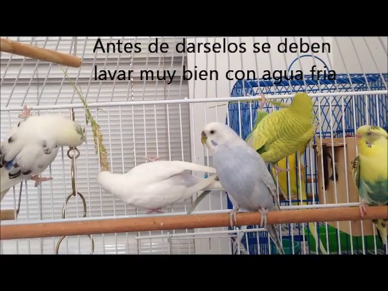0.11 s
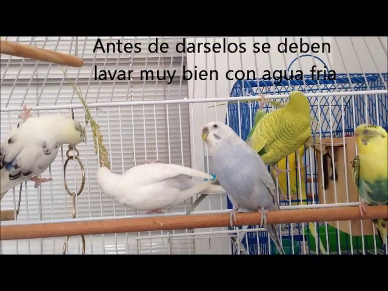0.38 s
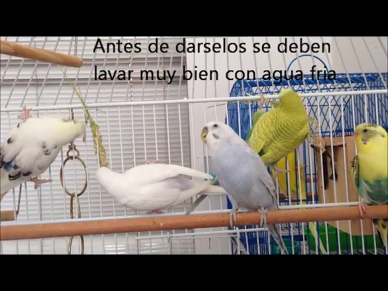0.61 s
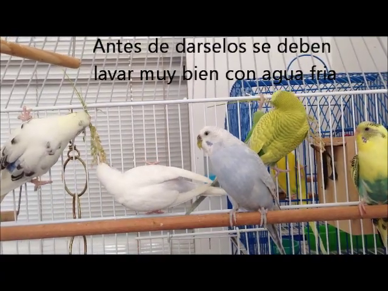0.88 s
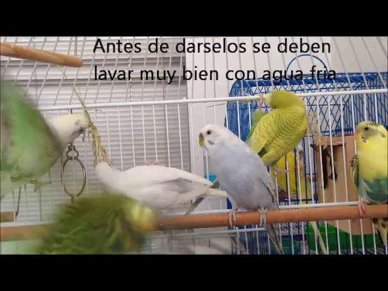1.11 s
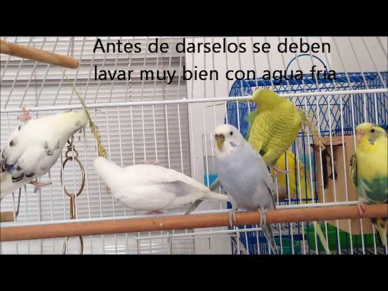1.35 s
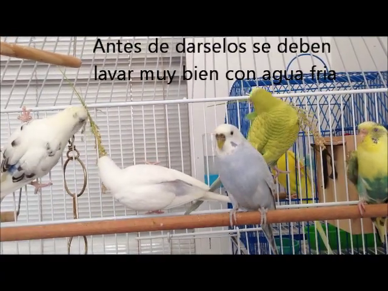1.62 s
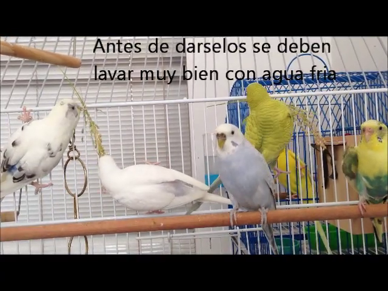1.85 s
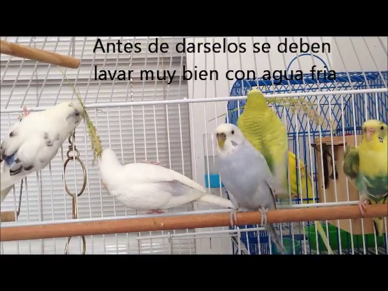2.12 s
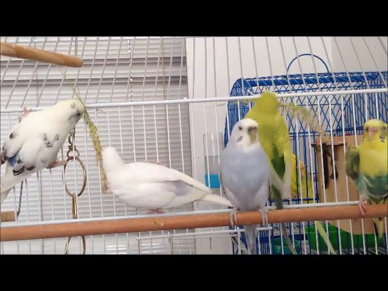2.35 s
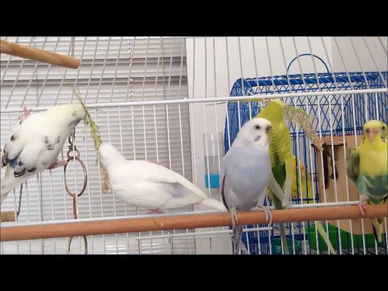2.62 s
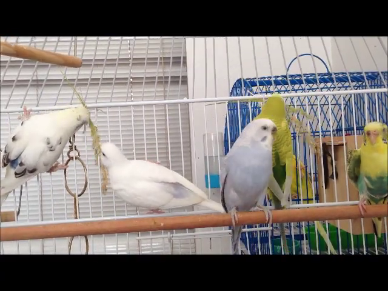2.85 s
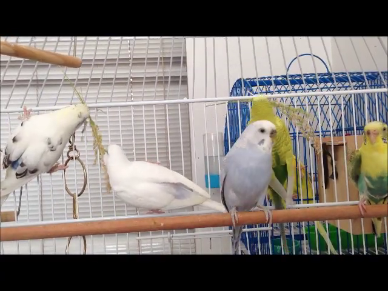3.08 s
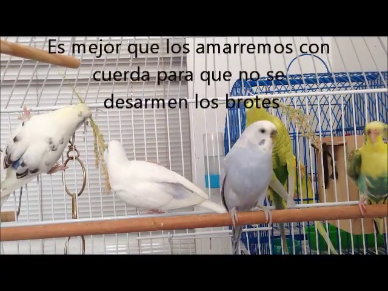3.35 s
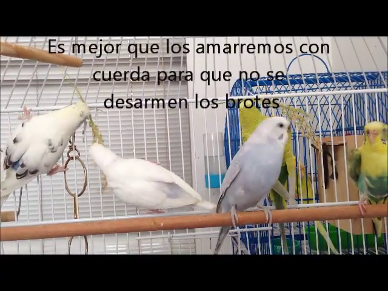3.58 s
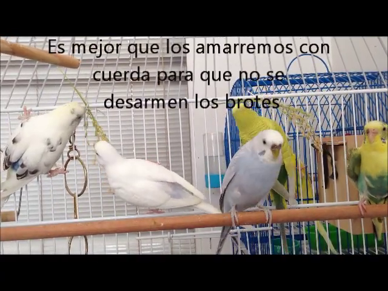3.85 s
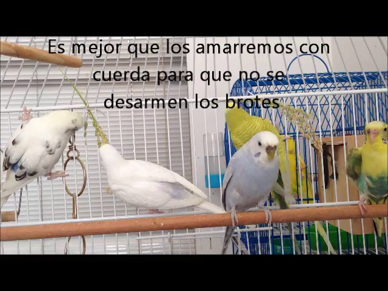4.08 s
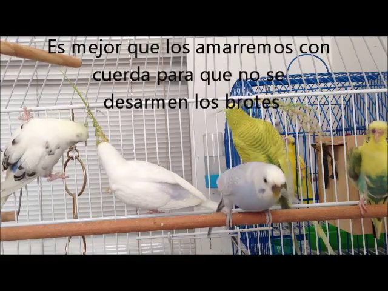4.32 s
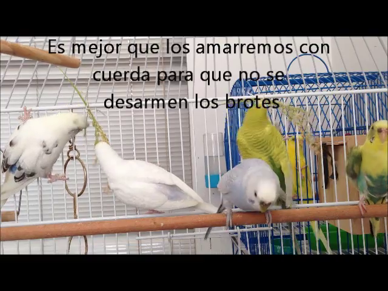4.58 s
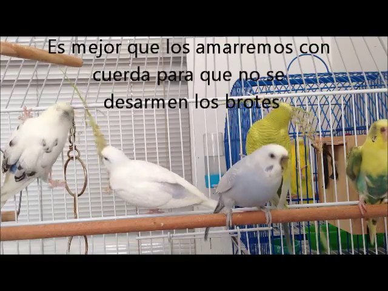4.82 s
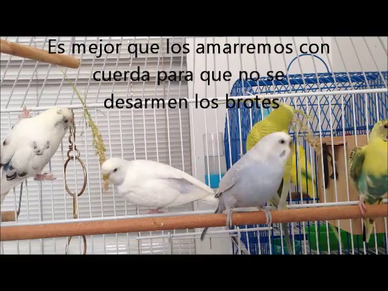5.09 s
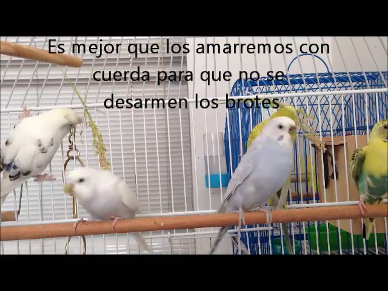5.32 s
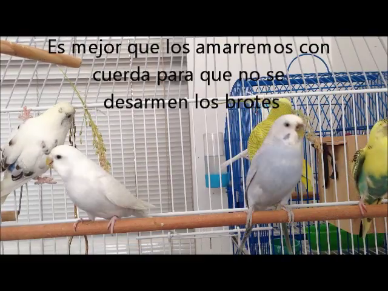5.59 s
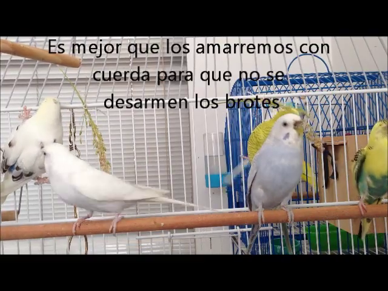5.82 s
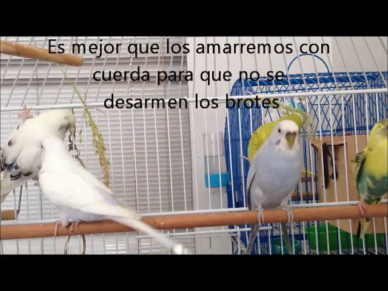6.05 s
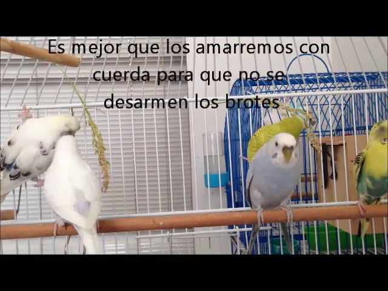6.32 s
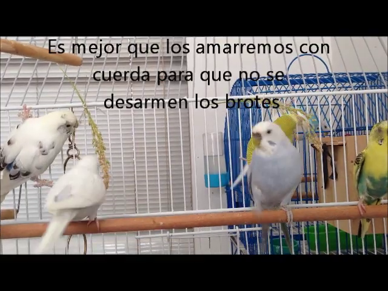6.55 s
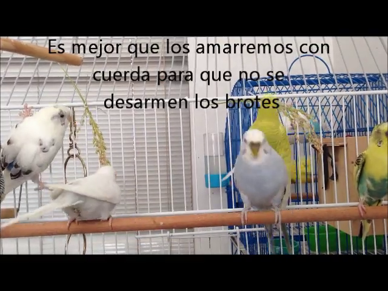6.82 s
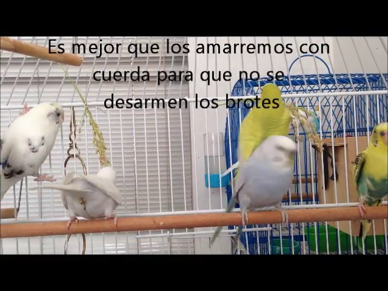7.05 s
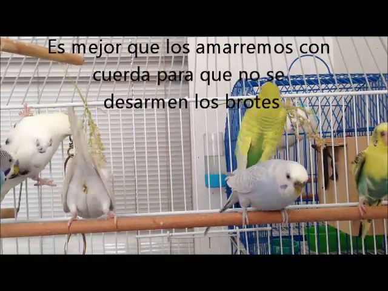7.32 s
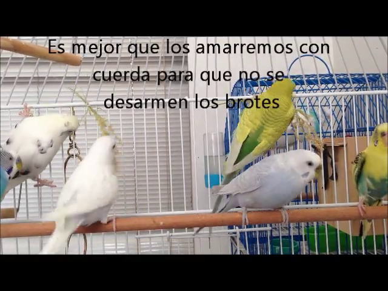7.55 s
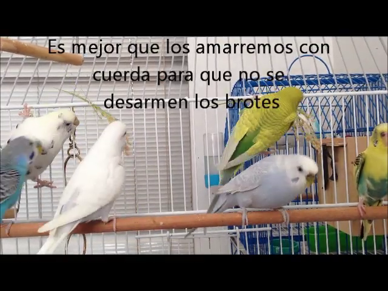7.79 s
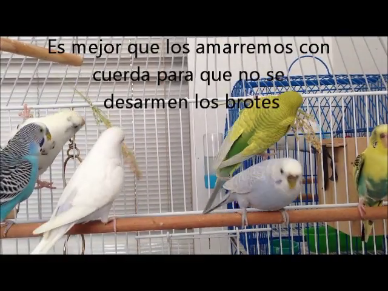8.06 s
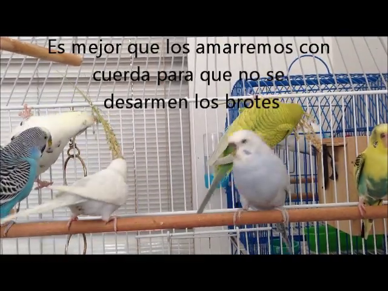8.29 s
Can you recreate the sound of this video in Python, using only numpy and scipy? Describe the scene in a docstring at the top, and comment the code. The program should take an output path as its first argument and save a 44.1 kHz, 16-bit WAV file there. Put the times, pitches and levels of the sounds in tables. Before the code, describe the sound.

Several budgerigars in a wire cage chirp close to a phone microphone. Quick chips open, then rolling chirps and isolated notes with gaps. A squawk and a wing flutter come just after one second, and small claw ticks touch the wire. From about four seconds raspy squawks and rising calls crowd together, then recur singly until a final flurry of chatter. The hard-walled room rings briefly over faint hum and hiss.

```python
"""Caged budgerigars in a hard-walled room

Place: a quiet room with a wire cage of budgerigars, near a phone microphone.
Gliding tones make the learned calls and loose warbles; an overtone-rich pulsed voice makes the squawks.
Claws and beaks on the wire are filtered noise clicks with a faint ring; wings are throbbing noise.
The nearest bird is the driest; the room rings for about a third of a second over a faint hum and hiss."""
import sys
import numpy as np
from scipy import signal
from scipy.fft import rfft, irfft, next_fast_len
from scipy.io import wavfile
from scipy.ndimage import uniform_filter1d, minimum_filter1d, map_coordinates

SR = 44100
rng = np.random.default_rng(int(sys.argv[2]) if len(sys.argv) > 2 else 0)


def convert_level_to_amplitude(level_db):
    """Map a level in decibels to its linear amplitude factor."""
    exponent = np.asarray(level_db, float) / 20
    return 10 ** exponent


def transcribe(signal):
    """Save signal, clipped to [-1, 1], as a 16-bit WAV file at the path in sys.argv[1]."""
    frames = np.atleast_2d(signal).T
    limited = np.clip(frames, -1, 1)
    pcm = np.round(limited * 32767).astype(np.int16)
    wavfile.write(sys.argv[1], SR, pcm)


N = 371322


def unit(x):
    """Scaled to rms 1."""
    return x / np.sqrt(np.mean(x ** 2) + 1e-20)


def along(points, hz):
    """Reads (frequency [Hz], value) points at hz, on a log frequency axis."""
    f, value = np.transpose(points)
    return np.interp(np.log(hz + 1), np.log(f + 1), value)


def wobble(rate, size):
    """A smooth random curve, rate knots a second."""
    knots = rng.standard_normal(int(size * rate / SR) + 4)
    return map_coordinates(knots, [np.arange(size) * rate / SR])


def coloured(x, gain_db):
    """x through a filter given as dB over frequency."""
    padded = next_fast_len(len(x) + 8192)
    gain = convert_level_to_amplitude(gain_db(np.fft.rfftfreq(padded, 1 / SR)))
    return irfft(rfft(x, padded) * gain, padded)[:len(x)]


def add(track, s, x):
    """Mixes x into the track at s seconds."""
    part = track[max(round(s * SR), 0):][:len(x)]
    part += x[:len(part)]


def patchy(x, depth_db):
    """Random louder and softer patches over time and frequency."""
    z = signal.stft(x, nperseg=1024)[2]
    field = uniform_filter1d(rng.standard_normal(z.shape), size=4, axis=0)
    field = uniform_filter1d(field, size=9, axis=1)
    return unit(signal.istft(z * convert_level_to_amplitude(depth_db * unit(field)), nperseg=1024)[1][:len(x)])


# colour of distant machinery: (frequency [Hz], level [dB])
HUM_COLOUR = [(15, -78.5), (25, -32), (70, -39), (149, -9.5), (178, -7.5), (210, -2.5), (227, -2),
              (259, -14), (361, -4.5), (419, -4.5), (458, -13), (667, -15.5), (719, -15), (900, -19),
              (1170, -45.5), (1980, -120)]


def hum():
    """Distant machinery: low coloured noise that wavers, with one firmer tone."""
    level_db, waver_db, waver_hz = -56.5, 1.5, 3.5

    def colour(f):
        firm_tone = 6 / (1 + ((f - 210) / 3.5) ** 2)
        return along(HUM_COLOUR, f) + firm_tone

    low = patchy(coloured(rng.standard_normal(N), colour), depth_db=3.0)
    return convert_level_to_amplitude(level_db + waver_db * wobble(waver_hz, N)) * low


# colour of the room tone: (frequency [Hz], level [dB])
HISS_COLOUR = [(530, -41), (900, -18), (991, -16), (1120, -11), (1490, -21.5), (1920, -15.5), (2410, -17),
               (8680, -23), (14500, -25), (15800, -33.5)]


def hiss():
    """Room tone: steady coloured noise, gently patchy."""
    level_db = -61.5
    noise = coloured(rng.standard_normal(N), lambda f: along(HISS_COLOUR, f))
    return convert_level_to_amplitude(level_db) * patchy(noise, depth_db=2.0)


# overtones at the syrinx, before roughness strengthens them: (multiple of the pitch, level [dB])
OVERTONES = [(.5, -35.5), (2, -11.5), (3, -18), (4, -29.5), (5, -26.5)]


def whistle(length, from_hz, to_hz, rough):
    """A gliding tone; in rough notes the syrinx flutters: pitch bends, level chops, a lower voice joins."""
    size = round(length * SR)
    u = np.arange(size) / size
    rough = np.clip(rough, 0, 1)
    flutter_hz = 330 * np.exp(.3 * wobble(80, size))
    flutter = 2 * np.pi * (rng.random() + np.cumsum(flutter_hz) / SR)
    bend = .09 * wobble(130, size) + 0.16 * np.sin(flutter) + 0.074 * wobble(1500, size)
    hz = from_hz * (to_hz / from_hz) ** u * np.exp(rough * bend)
    phase = 2 * np.pi * np.cumsum(hz) / SR
    tone = np.sin(phase)
    for k, db in OVERTONES:
        level = convert_level_to_amplitude(db + (22 if k < 1 else 4) * rough)
        tone = tone + level * np.sin(k * phase) * (k * hz < SR / 2)
    rasp = (0.027 + 0.095 * rough) * rng.standard_normal(size)
    chop = 1 + np.sqrt(rough) * np.tanh(np.cos(flutter) + wobble(500, size))
    edges = np.minimum(u, 1 - u) * length / .0015  # 1.5 ms fades
    swell = np.clip(np.minimum(.25 + u / .45, edges), 0, 1)
    return unit((tone + rasp) * chop) * swell / np.sqrt(2)


# windpipe and beak of a whistling bird: (frequency [Hz], level [dB])
THROAT = [(500, -35.5), (1000, -12.5), (1600, -10), (2400, -1), (3500, 2.5), (5500, -6), (7200, -7.5),
          (10000, -10.5), (15000, -27)]


def throat(track):
    """Windpipe and beak filter what the syrinx sings."""
    return coloured(track, lambda f: along(THROAT, f))


# loose notes, whistled and buzzed, levels ahead of the throat:
# (time [s], length [s], from [Hz], to [Hz], level [dB])
NOTES = [(0, 0.0028, 3950, 4240, -11.5), (.004, 0.013, 4230, 4450, -15.5), (.01, 0.0089, 6120, 5620, -13),
         (0.014, 0.024, 4535, 4715, -14), (0.996, 0.0082, 4544, 5200, -16), (1.001, .024, 2613, 3347, -23),
         (1.005, 0.011, 5260, 6660, -12.5), (1.031, 0.037, 5890, 5070, -18),
         (1.033, 0.018, 2846, 2590, -20.5), (1.848, 0.0064, 2426, 2560, -20.5),
         (1.859, 0.031, 3823, 3630, -22), (1.899, 0.017, 2462, 2420, -23.5),
         (1.904, 0.033, 4268, 3874, -18), (1.933, 0.032, 2843, 2860, -19), (2.914, 0.0047, 2260, 2540, -20),
         (2.921, 0.019, 5290, 6280, -14.5), (2.949, 0.023, 3054, 3734, -20.5),
         (2.977, 0.025, 5230, 5446, -9.5), (3.906, .004, 5490, 4037, -21.5), (4.1, 0.07, 3397, 3570, -34),
         (4.101, 0.033, 1153, 1216, -23), (4.162, 0.021, 1202, 1242, -21), (4.447, 0.018, 1179, 1210, -24),
         (4.575, 0.004, 4660, 3910, -14.5), (4.714, .005, 4400, 3505, -17),
         (4.91, 0.0096, 5300, 5600, -11.5), (4.913, 0.0099, 2704, 2716, -16),
         (6.022, 0.07, 1930, 1860, -57.5), (6.951, 0.037, 3450, 3100, -15), (6.979, 0.012, 4390, 3945, -12),
         (7.026, 0.022, 4440, 3317, -9), (8.138, 0.004, 5546, 3930, -22), (8.279, .02, 2856, 3100, -28),
         (8.302, 0.0078, 2830, 2594, -19), (8.308, .013, 4477, 3614, -19), (8.318, .035, 3610, 4203, -20),
         (8.349, 0.013, 4420, 3960, -13.5), (8.364, 0.0082, 3093, 2840, -20),
         (8.384, 0.03, 2101, 2192, -25.5), (8.405, 0.014, 2707, 2390, -23.5),
         (8.406, 0.024, 4280, 4770, -29)]
BUZZES = [(0, 0.017, 7210, 6690, -22), (1.052, .022, 3800, 4530, -14.5), (1.074, 0.0041, 2906, 1460, -23),
          (1.823, 0.039, 2874, 3207, -32.5), (1.941, 0.031, 4084, 4073, -22),
          (2.924, 0.055, 4237, 4180, -23), (2.938, 0.0088, 3800, 2063, -16),
          (2.941, 0.023, 5880, 5600, -23), (2.995, 0.013, 4795, 3350, -15),
          (4.094, 0.067, 2600, 2540, -29.5), (4.1, 0.16, 4800, 5080, -29.5),
          (4.455, 0.025, 2313, 2340, -25.5), (6.988, 0.035, 3230, 2580, -16.5),
          (8.377, 0.00745, 2720, 1195, -18.5)]


def songs():
    """Loose notes: whistles roughen away from the easiest pitch, buzzes are rough throughout."""
    clearest_hz, pure_rough, rough_per_octave, buzzed_rough = 3100, 0.1, .24, .7  # roughness 0-1
    track = np.zeros(N)
    for s, length, from_hz, to_hz, db in NOTES:
        rough = pure_rough + rough_per_octave * abs(np.log2(from_hz / clearest_hz))
        add(track, s, convert_level_to_amplitude(db) * whistle(length, from_hz, to_hz, rough))
    for s, length, from_hz, to_hz, db in BUZZES:
        add(track, s, convert_level_to_amplitude(db) * whistle(length, from_hz, to_hz, buzzed_rough))
    return throat(track)


# learned calls, one row a syllable, times and lengths before the call is stretched:
# (time after start [s], length [s], from [Hz], to [Hz], roughness [clipped to 0-1], level over the call [dB])
CHIP = [(0.00052, 0.009, 3950, 4350, 0.085, -1.5), (.009, 0.0053, 4400, 3200, 0.33, -6.5),
        (.013, 0.006, 2500, 2090, 0.51, -10.5), (0.0073, 0.0089, 8400, 4200, .5, -1)]
ROLLING = [(0, 0.019, 3347, 3430, 0.02, -9), (.017, 0.015, 3406, 3616, .35, -3),
           (.027, 0.0097, 3800, 3917, 0.12, 3), (.034, .006, 3300, 1315, .6, -1.5),
           (.035, .032, 2916, 2700, 0.6, -5), (.062, .034, 2903, 3105, .12, -1),
           (.095, .034, 1915, 1490, .6, -7.5), (.094, .04, 3300, 2784, 0.92, -6.5)]
RISING = [(0, 0.011, 3800, 3723, 0.13, -2.5), (.01, 0.012, 3466, 1286, 1.2, -3),
          (.024, 0.024, 2079, 3062, 0.6, -4.5), (.025, .009, 4173, 4220, .45, -6),
          (.047, .015, 2424, 3200, .6, -1.5), (.061, 0.016, 3505, 3639, 0.05, 1.5)]
# when each call is sung, levels ahead of the throat: (time [s], level [dB], stretch [times])
CHIP_TIMES = [(0.136, -10.5, 1.16), (0.2, -8, 0.99), (0.27, -13, 1.001)]
ROLLING_TIMES = [(0.709, -11.5, 1.001), (3.631, -14.5, 0.96), (4.716, -12, 1.001)]
RISING_TIMES = [(2.684, -15, 0.91), (3.909, -11.5, 0.94), (4.578, -11.5, 1.025), (6.56, -13, 1.001),
                (8.141, -15, 1.04)]


def calls(syllables, times):
    """A learned call, sung syllable by syllable each time, never quite alike in strength."""
    track = np.zeros(N)
    for s, call_db, stretch in times:
        for after, length, from_hz, to_hz, rough, db in syllables:
            level = convert_level_to_amplitude(call_db + db + rng.normal(0, 0.27))
            note = whistle(stretch * length, from_hz, to_hz, rough)
            add(track, s + stretch * after, level * note)
    return throat(track)


# contacts on the wire: (time [s], peak of the click [dB], click pitch [Hz], ring over full scale click [dB])
TICKS = [(1.2042, -29.5, 2430, -37.5), (1.5121, -35, 2390, -32), (1.5444, -38, 2790, -36),
         (1.5527, -31, 6930, -43), (1.5666, -33, 6900, -38), (1.6452, -41, 7730, -40),
         (2.35, -36, 1770, -30), (3.176, -36, 1700, -43), (3.188, -41, 7600, -24), (3.3189, -19, 4220, -54),
         (3.379, -43, 8000, -16.5), (3.5217, -22.5, 2670, -55), (6.259, -29.5, 3480, -46),
         (6.315, -43, 4800, -41), (6.382, -45.5, 4790, -40), (6.424, -46, 4800, -40.5),
         (7.5841, -24, 4850, -47)]
# ring of the cage wire, before a random 2 dB scatter: (frequency [Hz], level [dB], 60 dB decay [s])
WIRE = [(3800, -4, 1), (5600, -3.5, 1), (8400, -4.5, .35), (10200, 2, 0.27)]


def ticks():
    """A claw or beak scrapes off the wire: a dry click and a faint metallic ring."""
    light_db, light_scrape_s = -34.5, 0.0033  # a light contact, falling 20 dB in this time
    drag = .3  # harder contacts drag longer: dB of length per dB of level
    track, t = np.zeros(N), np.arange(SR // 3) / SR
    for s, db, hz, ring_db in TICKS:
        scrape_s = light_scrape_s * convert_level_to_amplitude(drag * (db - light_db))
        ring = np.zeros(len(t))
        for f, level, t60 in WIRE:
            ring += convert_level_to_amplitude(level + rng.normal(0, 2) - 60 * t / t60) * np.sin(2 * np.pi * f * t)
        grit = rng.standard_normal(len(t)) * convert_level_to_amplitude(-20 * t / scrape_s) * (1 - np.exp(-t / 0.00017))
        click = coloured(grit, lambda f: -10 * np.abs(np.log2(f / hz + 0.011)) - 20 * (f < 1200))
        add(track, s, convert_level_to_amplitude(db) * (click / np.abs(click).max() + convert_level_to_amplitude(ring_db) * ring))
    return track


# squawks: (time [s], length [s], rms level [dB], voice [Hz], pulsing [0-1])
SQUAWKS = [(1.255, 0.058, -16.5, 2921, .85), (4.143, .06, -24.5, 2630, .4), (4.277, 0.079, -17, 3310, .55),
           (4.459, 0.064, -18, 3083, .45), (4.726, .11, -22, 2874, .4), (4.905, 0.071, -15.5, 2893, .6),
           (5.373, 0.078, -24.5, 2760, .4), (5.608, 0.063, -22, 2757, .4), (6.735, 0.083, -16.5, 2527, .85),
           (7.036, 0.056, -21.5, 2650, .4), (7.172, 0.074, -21, 2570, .3), (7.378, 0.079, -19, 2473, .35),
           (7.829, 0.072, -20, 2585, .3)]
# colour of a squawk at the beak: (frequency [Hz], level [dB])
BEAK = [(410, -50), (700, -24), (1150, -25), (1500, -12), (2080, -4.5), (2340, -11), (2870, -4.5),
        (3110, -5), (3630, 1), (4830, 0), (7030, -5.5), (11700, -24.5), (15500, -27.5)]


def squawks():
    """An overtone-rich voice in uneven pulses; its pitch jumps between pulses and swoops inside each."""
    calm_db = -21  # a squawk of ordinary effort
    calm_tilt, tilt_per_db = 0.15, 0.37  # dB per octave; louder squawks are brighter
    track = np.zeros(N)
    for s, length, db, hz, pulsing in SQUAWKS:
        tilt = calm_tilt + tilt_per_db * (db - calm_db)
        size = round(length * SR)
        u = np.arange(size) / size
        beat = np.cumsum(180 * np.exp(.2 * wobble(120, size))) / SR  # pulses so far
        per_pulse = np.tanh(rng.standard_normal((size // 50, 3)))
        jump, swoop, force = per_pulse[beat.astype(int)].T
        bend = .14 * jump + .35 * swoop * (beat % 1 - .5) + 0.0797 * wobble(700, size)
        phase = 2 * np.pi * np.cumsum(hz * np.exp(bend)) / SR
        voice = np.zeros(size)
        for k in range(1, 11):  # every other cycle differs, which adds weaker lines halfway
            voice += convert_level_to_amplitude(2.2 * wobble(250, size) - 7.1 * (k % 2)) * np.sin(k / 2 * phase)
        pulse = convert_level_to_amplitude(0.64 * force) * 8 / 3 * np.sin(np.pi * beat) ** 4
        gate = 1 - np.clip(pulsing, 0, .85) * (1 - pulse)
        swell = u ** .75 * (1 - u) ** .25
        burst = np.pad((unit(voice) + .5 * rng.standard_normal(size)) * gate * swell, 200)
        burst = coloured(burst, lambda f: along(BEAK, f) + tilt * np.log2(f / 4500 + .01))
        add(track, s - 200 / SR, convert_level_to_amplitude(db) * unit(burst))
    return track


# wing flurries: (time at full strength [s], hold [s], whirr [dB], push of air [dB], rise [dB/s])
FLURRIES = [(1.345, 0.097, -35, -51.5, 129), (5.506, 0.018, -38, -88, 500), (7.086, 0.055, -44, -71, 220)]
# whirr of wings: (frequency [Hz], level [dB])
WHIRR = [(65, -39.5), (110, -8.5), (209, 0.5), (334, -9), (521, -6.5), (578, -13), (642, -4.5),
         (704, -11.5), (2500, -20.5), (3250, -56), (5500, -120)]
# air pushed at the microphone: (frequency [Hz], level [dB])
PUSH = [(12, -48), (20, -19.5), (91, 1), (110, 5), (140, -33.5), (240, -120)]


def wings():
    """Low puffs of air that swell, hold and die away, throbbing with the wing beat."""
    beat_hz, beat_db, fall_db_per_s = 40.5, 5, 130
    track, t = np.zeros(N), np.arange(N) / SR
    beat = convert_level_to_amplitude(beat_db * np.sin(2 * np.pi * beat_hz * t) + 1.5 * wobble(20.5, N))
    whirr = unit(coloured(beat * rng.standard_normal(N), lambda f: along(WHIRR, f)))
    push = unit(coloured(beat * rng.standard_normal(N), lambda f: along(PUSH, f)))
    for s, hold, whirr_db, push_db, rise_db_per_s in FLURRIES:
        rise_db = -rise_db_per_s * np.maximum(s - t, 0)
        fall_db = -fall_db_per_s * np.maximum(t - s - hold, 0)
        swell_db = rise_db + fall_db
        track += convert_level_to_amplitude(swell_db + whirr_db) * whirr + convert_level_to_amplitude(swell_db + push_db) * push
    return track


# near surfaces: (delay [s], level [dB])
WALLS = [(.0021, -14), (.0037, -6.5), (.0064, -10.5), (.0093, -15), (0.013, -11), (0.02, -16),
         (0.026, -14.5)]


def early(x):
    """Cage tray, shelf and near walls send back a few close copies, turned over at random."""
    near = x.copy()
    for delay, db in WALLS:
        add(near, delay, rng.choice([-1, 1]) * convert_level_to_amplitude(db) * x)
    return near


# ring of the room: (frequency [Hz], 60 dB decay [s])
ROOM = [(1000, 0.44), (3000, 0.36), (6000, 0.33), (12000, 0.23)]


def room(x):
    """Birds sit in different places, so each moment gets its own noise tail; treble dies first."""
    wet, hop = np.zeros(N), SR // 8
    padded = np.pad(x, (hop, 2 * hop))
    for start in range(-hop, N, hop):
        hz, t, z = signal.stft(rng.standard_normal(SR // 2), SR, nperseg=256)
        decay = convert_level_to_amplitude(-60 * t / along(ROOM, hz)[:, None])
        tail = signal.istft(z * decay, SR, nperseg=256)[1]
        piece = padded[start + hop:][:2 * hop] * np.hanning(2 * hop)
        echo = signal.fftconvolve(piece[max(-start, 0):], tail / np.linalg.norm(tail))
        add(wet, max(start, 0) / SR + .008, echo)  # the tail sets in after 8 ms
    return wet


def scene():
    """The bird with the rising call sits nearest and driest; the scolding ones face away, sounding wetter."""
    near = calls(RISING, RISING_TIMES)
    flock = calls(ROLLING, ROLLING_TIMES) + calls(CHIP, CHIP_TIMES) + songs()
    scold, wire = squawks(), ticks()
    direct = 0.4 * near + early(0.74 * near + flock + scold + wire)
    to_room = convert_level_to_amplitude(-8.0) * near + convert_level_to_amplitude(-3.5) * flock + convert_level_to_amplitude(-3.5) * scold + convert_level_to_amplitude(-4.0) * wire
    return (direct + room(to_room) + wings() + hum() + hiss())[None]


def low_pass(x):
    """Removes everything above the highest recorded frequency."""
    return signal.sosfilt(signal.butter(12, 16350, fs=SR, output="sos"), x)


def record(dry):
    """A fast limiter at the microphone turns down, over about 2 ms, peaks beyond full scale."""
    need = minimum_filter1d(1 / np.maximum(np.abs(dry), 1), size=89, axis=1)
    gain = uniform_filter1d(need, size=45, axis=1)
    return low_pass(dry * gain)


dry = scene()
out = record(dry)
transcribe(out)
```